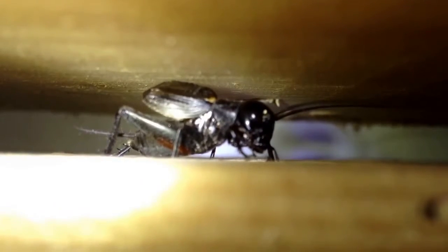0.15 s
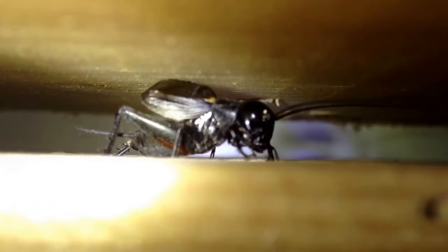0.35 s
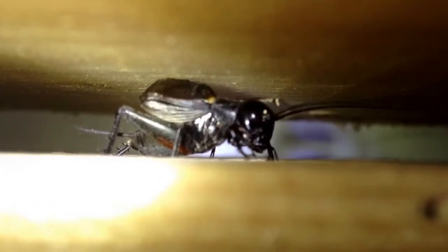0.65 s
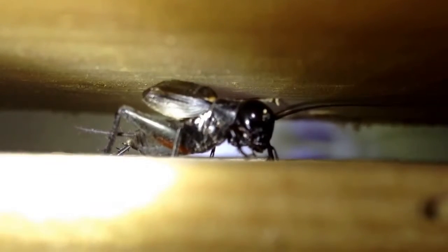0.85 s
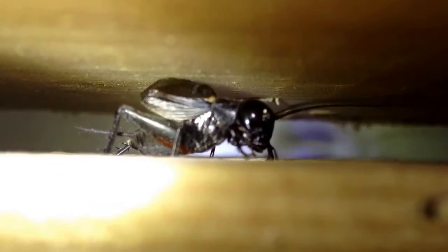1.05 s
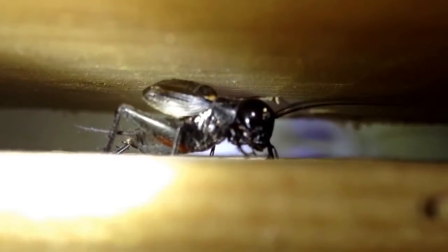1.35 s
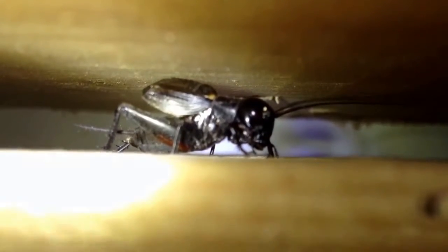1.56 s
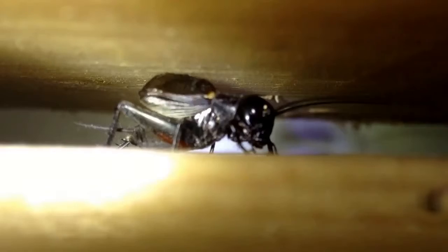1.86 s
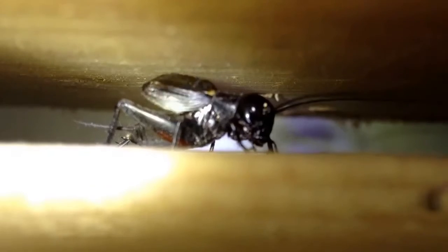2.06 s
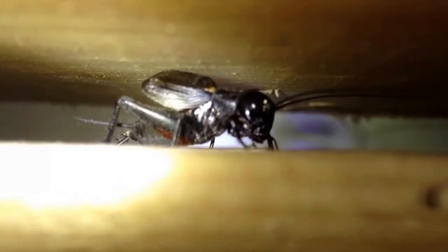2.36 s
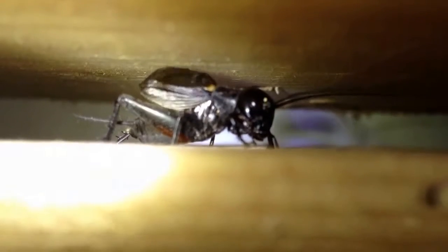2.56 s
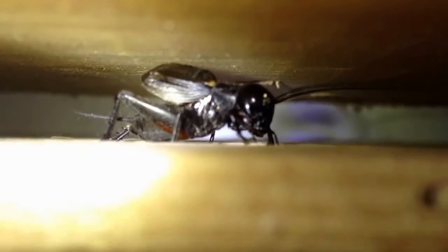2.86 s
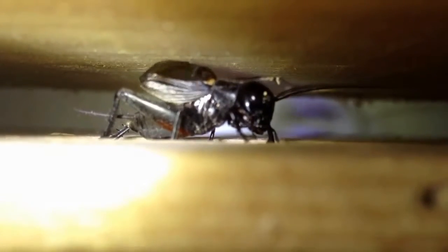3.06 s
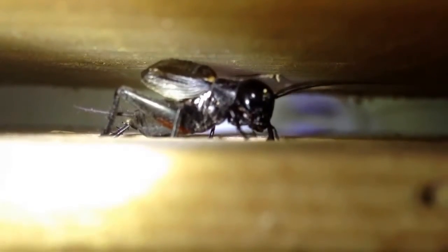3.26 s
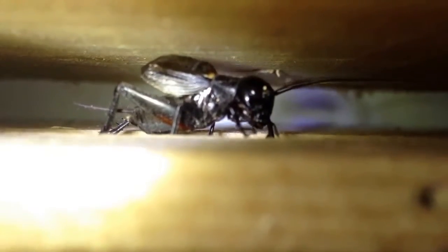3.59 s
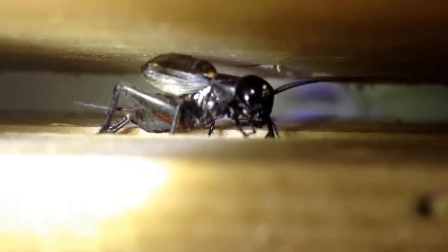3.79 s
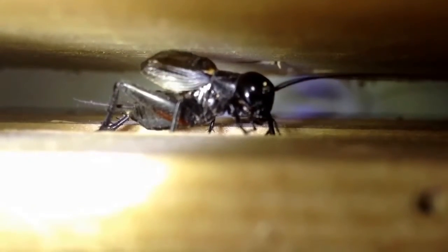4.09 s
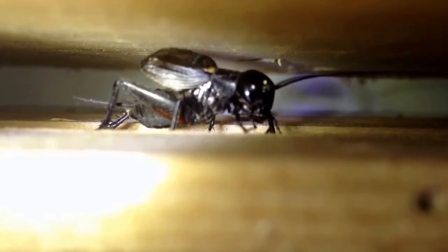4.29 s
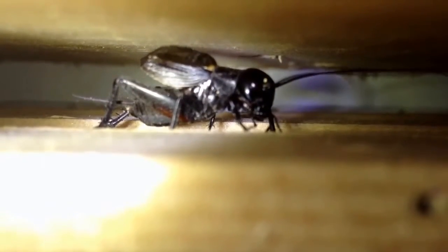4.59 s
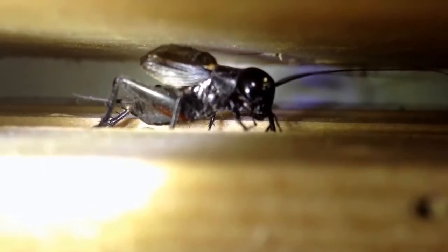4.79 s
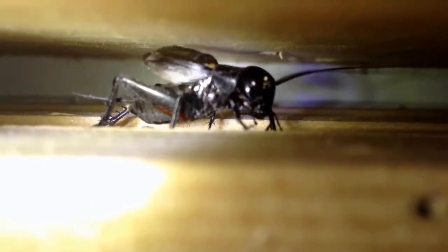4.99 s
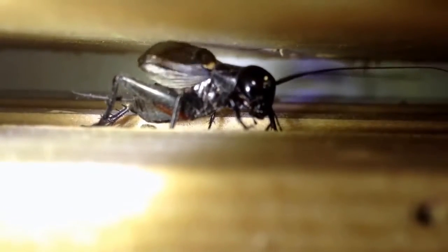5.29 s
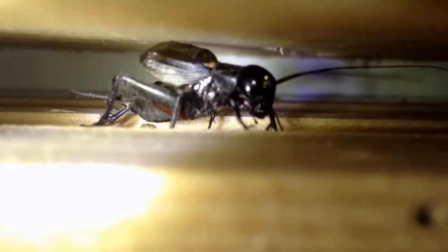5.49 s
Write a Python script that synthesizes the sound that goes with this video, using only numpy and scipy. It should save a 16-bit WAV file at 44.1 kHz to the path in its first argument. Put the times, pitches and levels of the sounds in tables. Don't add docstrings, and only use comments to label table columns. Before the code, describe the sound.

A single field cricket chirps very close from the start, quick high trills of two or three pulses at slightly uneven intervals. Soft brushing and light wooden taps come in beneath, then dry gritty crackles gather around the middle. Near the end a heavier bump on wood bounces briefly to rest while the chirps continue. Tight wooden gap at night, short board echoes, steady hiss and faint distant crickets; close small microphone, thin in the bass.

```python
import sys
import numpy as np
from scipy import signal
from scipy.fft import rfft, irfft
from scipy.io import wavfile

SR = 44100
rng = np.random.default_rng(int(sys.argv[2]) if len(sys.argv) > 2 else 0)


def undo_db(level):
    steps = np.asarray(level, float) / 20
    return 10 ** steps


def bounce(signal):
    frames = np.transpose(np.atleast_2d(signal))
    limited = np.clip(frames, -1, 1)
    pcm = np.round(limited * 32767).astype(np.int16)
    wavfile.write(sys.argv[1], SR, pcm)


N = 248724

# f/Hz, density/dB per Hz
HISS_SPECTRUM = [(18, -56), (30, -55), (43, -20.5), (182, -1), (284, -4), (505, -9), (728, -8), (1020, -9),
                 (1140, -10.5), (1330, -11.5), (3780, -13.5), (4660, -10), (9680, -23), (13300, -17.5),
                 (15500, -13.5)]
# top t/s, peak level/dB, rise/s, fall/s (both over 20 dB)
DRONE_SWELLS = [
    (0.41, -74.5, 4.2, 1.5),
    (1.43, -70, 0.58, 0.79),
    (1.75, -78.5, 0.65, 0.55),
    (2.81, -76.5, 0.39, 0.92),
    (3.58, -76, 0.43, 0.78),
    (4.4, -68, 0.31, 1.6),
    (5.64, -85, 0.39, 1.0),
]
# f/Hz, density/dB per Hz
BRUSH_SPECTRUM = [(71, -35), (120, -3), (374, -8), (500, 0.5), (785, -5), (1800, -0.5), (2080, -4),
                  (4610, -8.5), (9000, -19.5), (11700, -61), (19800, -120)]
# top t/s, peak level/dB, brightness/dB, rise/s, fall/s (both over 20 dB)
BRUSH_STROKES = [(0.1, -65.5, -3, 0.27, 0.3), (0.255, -53, -35, 0.012, 0.13), (0.372, -60, -24, 0.019, .2),
                 (0.412, -58.5, 2.5, 0.0079, 0.12), (1.11, -63.5, -22, 0.093, 0.32),
                 (1.19, -65.5, 6, 0.087, 0.17), (1.836, -66.5, -9, 0.16, 0.055),
                 (2.455, -59, -12, 0.0095, 0.2), (2.818, -65, -8, 0.057, .03), (2.99, -71.5, -1, .1, 0.17),
                 (3.385, -66.5, -22, .03, 0.25), (3.465, -66.5, -2, 0.18, .02), (3.508, -64, -6, .035, .2),
                 (3.8, -78, 2, 0.5, .08), (5.25, -67.5, -5, 0.23, 0.026),
                 (5.286, -60.5, -27, 0.0053, 0.012)]
# t/s, peak level/dB, lower band/dB
DRY_TICKS = [(1.736, -59.5, 3.5), (2.817, -57.5, 6), (2.8888, -62, 0), (2.948, -61.5, 4), (2.988, -61, 4),
             (3.013, -61, 5.5), (3.0407, -67, 13), (3.5924, -53, -3), (3.6426, -63, 3), (3.6574, -58, 1),
             (3.6735, -49, -5.5), (3.6874, -61, -3), (3.717, -58, -7), (3.7274, -63, -17),
             (3.7394, -64, -17), (3.7494, -63, -14), (3.7814, -49, -1), (3.788, -44, -4), (3.806, -58, 1),
             (3.8317, -56, -5), (3.8816, -58, -13), (3.8964, -57, -17), (4.5326, -61, -7), (4.5544, -63, 4),
             (4.8389, -60, -5), (4.8549, -56, -2), (4.8644, -63, -12), (5.2001, -60, -1),
             (5.214, -65.5, 7.5)]
# t/s, peak level/dB, lower band/dB, length/ms
DRY_SHUFFLES = [
    (2.1, -77, 11, 14),
    (2.495, -62, -3, 70),
    (3.3, -76, 10, 12),
    (3.7, -61.5, -2, 200),
    (3.85, -72, -8, 120),
]
# t/s, peak level/dB, pitch f/Hz, brightness/dB
LIGHT_KNOCKS = [(0.248, -58, 440, -1), (0.405, -54.5, 228, -10), (1.628, -52.5, 139, -20),
                (1.865, -45, 198, -31), (2.041, -53, 168, -23), (2.45, -57.5, 550, -4),
                (2.667, -67, 186, 2), (2.817, -48.5, 197, -16), (2.951, -52.5, 198, -9),
                (2.987, -49, 188, -12.5), (3.009, -54, 232, -12), (3.035, -56, 196, -11),
                (3.379, -53, 532, -21), (3.4, -53, 563, -20), (3.505, -52, 203, -16),
                (3.532, -54, 235, -14), (3.604, -73, 215, -16), (3.748, -50, 201, -21),
                (3.8, -47.5, 275, -18), (3.819, -53.5, 157, -22), (3.915, -54, 510, -34),
                (4.867, -47, 242, -25)]
# t/s, peak level/dB, pitch f/Hz, brightness/dB, T60/s
HEAVY_BUMP = [
    (5.138, -42.5, 565, -2.5, .054),
    (5.144, -31, 423, -14, 0.016),
    (5.152, -33, 334, -32, 0.049),
    (5.163, -43, 172, -20, 0.11),
    (5.185, -54, 190, -28, .09),
    (5.211, -48.5, 274, -18, 0.07),
    (5.24, -42, 229, -19, 0.043),
    (5.261, -56, 255, -14, 0.017),
    (5.286, -42, 234, -16, .027),
    (5.296, -45, 170, -27, 0.02),
]
# multiple of pitch, level/dB
WOOD_MODES = [(1.0, 0.5), (1.45, -10.5), (.55, -13.5), (2.9, -7.5)]
# delay/ms, level/dB
BOARD_ECHOES = [(11.1, -24), (13.96, -22), (16.33, -26), (18.45, -19), (24.84, -29), (28.89, -24),
                (34.91, -25), (55.96, -32), (65.4, -34), (83.6, -33), (104.3, -34), (119.9, -34.5),
                (136.2, -37), (151.7, -39)]
# t/s, peak level/dB, pitch f/Hz
FAINT_STROKES = [(0.0167, -60.5, 4590), (0.4517, -65, 4760), (0.797, -66, 4644), (1.1851, -69, 4533),
                 (1.929, -68, 4600), (2.2523, -63, 4500), (2.6588, -60.5, 4630), (3.1892, -61.5, 4540),
                 (3.508, -70, 4707), (3.9564, -63.5, 4480), (4.273, -58.5, 4430), (5.036, -62, 4720),
                 (5.44, -57.5, 4700)]
# t/s, peak level/dB, pitch f/Hz, length/ms
MEDIUM_STROKES = [(0.0445, -38.5, 4775, 17), (0.4818, -39, 4770, 18.3), (0.8264, -37.0, 4790, 15),
                  (1.2125, -39, 4715, 17), (1.9593, -38, 4746, 16), (2.2836, -38.5, 4795, 16.4),
                  (2.6905, -37.5, 4780, 17.6), (3.2239, -37, 4770, 16), (3.537, -37, 4740, 14.9),
                  (3.9881, -36.5, 4725, 19.7), (4.3033, -35.5, 4730, 16), (5.0695, -34, 4684, 16),
                  (5.4712, -34, 4766, 15)]
FULL_STROKES = [(0.0836, -32.5, 4820, 15.7), (0.5233, -33, 4800, 14), (0.8661, -33, 4820, 16.6),
                (1.2501, -33, 4830, 14.6), (1.2973, -32, 4820, 16), (1.998, -33.5, 4813, 16.2),
                (2.3231, -33, 4830, 17), (2.7288, -33, 4820, 18.2), (3.2624, -32.5, 4810, 16),
                (3.5763, -31.5, 4820, 15.0), (4.0279, -30.5, 4810, 15.6), (4.3413, -31, 4806, 17),
                (5.1067, -30, 4810, 16.2), (5.511, -29.5, 4805, 15.4)]
# share of length, pitch shift/%, tone level/dB
FAINT_COURSE = [(-.3, 4, -24), (.2, 1.6, -8), (.5, -1.5, -9), (1, .4, -18)]
MEDIUM_COURSE = [(-.25, 1, -40), (-.03, 1, -17), (.1, 1.1, -5), (.36, .6, -.5), (.56, 0, -2),
                 (.72, -2.1, -5), (.85, -3.6, -4), (.98, -4.2, -19), (1.5, -4.5, -45)]
FULL_COURSE = [(-.3, 0, -40), (0, .8, -12), (.17, 1.7, -4.5), (.55, 1.4, -1.5), (.85, -.7, -1),
               (.99, -2.3, -12), (1.08, -2.8, -8), (1.3, -3.5, -18), (2.2, -4, -50)]
# level/dB, share at top, share to -10 dB before, after
FAINT_PARTIALS = [(-57, .2, .6, .5), (-60, .2, .6, .5), (0, 0.28, 0.7, 0.71)]
MEDIUM_PARTIALS = [(-27, 0.36, 0.54, 1.4), (-30, 0.59, .22, 0.31), (-21.5, .0, 0.23, 1.8)]
FULL_PARTIALS = [(-25, 0.39, 0.48, 0.53), (-36, 0.51, 0.66, .45), (-26.5, -0.19, 0.086, 2.4)]
# f/Hz, width/Hz, level/dB
WING_MODES = [(4434, 240, 8.5), (5940, 930, -2), (7630, 690, -4), (7770, 780, -4)]


def band(x, lo_hz, hi_hz):
    return signal.sosfilt(signal.butter(2, [lo_hz, min(hi_hz, .45 * SR)], "band", fs=SR, output="sos"), x)


def rms_one(x):
    return x / np.sqrt(np.mean(x ** 2) + 1e-20)


def resonance(x, hz, width_hz):
    r = np.exp(-np.pi * width_hz / SR)
    zeros = np.array([1, 0, -1]) * (1 - r * r) / 2
    return signal.lfilter(zeros, [1, -2 * r * np.cos(2 * np.pi * hz / SR), r * r], x)


def double_resonance(x, hz, width_hz):
    return resonance(resonance(x, hz, width_hz), hz, width_hz)


def drift(rate_hz):
    r = np.exp(-2 * np.pi * rate_hz / SR)
    return rms_one(signal.lfilter([1], [1, -2 * r, r * r], rng.standard_normal(N + SR))[SR:])


def coloured(x, spectrum):
    hz, db = np.transpose(spectrum)
    grid_hz = np.maximum(np.arange(N // 2 + 1) * SR / N, 1)
    gain = undo_db(np.interp(np.log(grid_hz), np.log(hz), db))
    return rms_one(irfft(rfft(x) * gain, N))


def add(out, s, piece):
    i = max(round(s * SR), 0)
    out[i:i + len(piece)] += piece[:N - i]


def swell(at, db, top, rise, fall, power=1):
    side = np.where(at < top, max(rise, .003), max(fall, .003))
    return db - 20 / power * np.abs((at - top) / side) ** power


def hiss():
    return undo_db(-65) * coloured(rng.standard_normal(N), HISS_SPECTRUM)


def far_crickets():
    song = rms_one(double_resonance(rng.standard_normal(N), hz=4700, width_hz=310))
    return undo_db(-85.5 + 3.6 * drift(38)) * song


def drone():
    air, t = rng.standard_normal(N), np.arange(N) / SR
    hum = rms_one(double_resonance(air, 293.5, 54) + 0.54 * band(air, 152, 495))
    return sum(undo_db(swell(t, db, s, rise, fall)) for s, db, rise, fall in DRONE_SWELLS) * hum


def brushing():
    t, level, bright = np.arange(N) / SR, np.zeros(N), np.zeros(N)
    for s, db, bright_db, rise, fall in BRUSH_STROKES:
        level += undo_db(swell(t, db, s, rise, fall))
        bright += undo_db(swell(t, db + bright_db, s, rise, fall))
    grains_per_s = 4000
    hits = rng.random(N) < grains_per_s / SR
    grains = hits * undo_db(rng.exponential(1, N)) * rng.choice([-1, 1], N)
    noise = undo_db(1.3 * drift(39)) * coloured(grains + 0.5 * rng.standard_normal(N), BRUSH_SPECTRUM)
    dull = signal.sosfilt(signal.butter(1, 2200, fs=SR, output="sos"), noise)
    return undo_db(2.0) * level * dull + undo_db(0.5) * bright * band(noise, 1730, 5650)


def ticks():
    tick_ms = 9.2
    high, low = np.zeros(N), np.zeros(N)
    for s, db, low_db, ms in [row + (tick_ms,) for row in DRY_TICKS] + DRY_SHUFFLES:
        burst = np.hanning(max(round(ms * SR / 1000), 8)) * undo_db(db - 7)
        add(high, s - 0.31 * ms / 1000, burst)
        add(low, s - 0.36 * ms / 1000, burst * undo_db(low_db))
    grit = rng.standard_normal(N) * undo_db(3.2 * drift(400))
    bright_grit = rms_one(band(band(grit, 12400, 17000), 12400, 17000))
    return high * bright_grit + low * rms_one(band(grit, 3800, 8100))


def knocks():
    knock_t60_s, crack_t60_s = 0.043, 0.042
    lag_s = 0.00299
    out, t = np.zeros(N), np.arange(SR // 4) / SR
    blows = [row + (knock_t60_s,) for row in LIGHT_KNOCKS] + HEAVY_BUMP
    chance = rng.standard_normal((len(blows), len(WOOD_MODES)))
    crack = rms_one(band(rng.standard_normal(N), 250, 2420))
    for (s, db, hz, bright_db, t60_s), spread in zip(blows, chance):
        body = np.zeros(len(t))
        for (multiple, mode_db), c in zip(WOOD_MODES, spread):
            level_db = mode_db + 2 * c - 60 * t * multiple / max(t60_s, .01)
            body += undo_db(level_db) * np.sin(2 * np.pi * hz * multiple * t)
        snap = undo_db(bright_db - 60 * t / crack_t60_s) * np.roll(crack, -round(s * SR))[:len(t)]
        add(out, s + lag_s, undo_db(db) * (body + snap) * np.clip(t / 0.001, 0, 1))
    return out


def surroundings(x):
    near_db, near_t60_s, far_db, far_t60_s = -13, 0.11, -29, 0.6
    t = np.arange(SR) / SR
    onset = np.clip((t - .008) / .01, 0, 1)
    near = rng.standard_normal(SR) * undo_db(-60 * t / near_t60_s) * onset
    far = rng.standard_normal(SR) * undo_db(-60 * t / far_t60_s) * onset
    far = far + undo_db(9) * resonance(far, hz=4915, width_hz=60)
    response = undo_db(near_db) * near / np.linalg.norm(near) + undo_db(far_db) * far / np.linalg.norm(far)
    for ms, db in BOARD_ECHOES:
        response[round(ms * SR / 1000)] += undo_db(db)
    return band(signal.fftconvolve(x, response)[:N], 90, 5850)


def wing_scrape():
    teeth = rng.standard_normal(N) * undo_db(2.2 * drift(500))
    wing = np.zeros(N)
    for k, (hz, width_hz, db) in enumerate(WING_MODES):
        wing += (-1) ** k * undo_db(db) * double_resonance(teeth, hz, 1.4 * width_hz)
    return rms_one(wing)


def strokes(table, course, partials, wobble_db, half_db, catch_db):
    catch_width, release_at, release_db = 0.086, 0.91, -100
    half_at, half_width = 0.05, 0.094
    share, shift_pct, tone_db = np.transpose(course)
    tone, scrape = np.zeros(N), np.zeros(N)
    for (s, db, hz, ms), start in zip(table, rng.random(len(table))):
        at = np.arange(share[0], share[-1], 1000 / SR / ms)
        pitch_hz = hz * (1 + np.interp(at, share, shift_pct) / 100)
        phase = 2 * np.pi * (start + np.cumsum(pitch_hz) / SR)
        second, third, rasp = (undo_db(db + swell(at, *row, power=2)) for row in partials)
        second = second * undo_db(catch_db * np.exp(-((at - partials[1][1]) / catch_width) ** 2))
        held = undo_db(release_db * np.maximum(at - release_at, 0))
        overtones = second * np.sin(2 * phase) + undo_db(3) * third * np.sin(3 * phase)
        half = undo_db(db + half_db) * np.exp(-((at - half_at) / half_width) ** 2) * np.sin(3 * phase / 2)
        wave = undo_db(db + np.interp(at, share, tone_db)) * np.sin(phase) + held * overtones + half
        begin_s = s + share[0] * ms / 1000
        add(tone, begin_s, np.sqrt(2) * wave)
        add(scrape, begin_s, rasp)
    return tone * undo_db(wobble_db * drift(220)) + undo_db(4.0) * scrape * wing_scrape()


def cricket():
    faint_ms = 7.5
    rows = [row + (faint_ms,) for row in FAINT_STROKES]
    faint = strokes(rows, FAINT_COURSE, FAINT_PARTIALS, wobble_db=3.0, half_db=-30, catch_db=0)
    medium = strokes(MEDIUM_STROKES, MEDIUM_COURSE, MEDIUM_PARTIALS, wobble_db=.8, half_db=-14, catch_db=-7)
    full = strokes(FULL_STROKES, FULL_COURSE, FULL_PARTIALS, wobble_db=.6, half_db=-25, catch_db=0)
    return faint + medium + full


def scene():
    mic_low_hz = 135
    song, wood = cricket(), knocks()
    near = song + wood + surroundings(song + undo_db(-3) * wood) + ticks() + brushing()
    near = signal.sosfilt(signal.butter(6, mic_low_hz, "high", fs=SR, output="sos"), near)
    return (near + drone() + hiss() + far_crickets())[None]


def low_pass(x):
    return signal.sosfilt(signal.butter(12, 15650, fs=SR, output="sos"), x)


def record(dry):
    stop_hz = 15550
    mix = signal.sosfilt(signal.cheby2(24, 60, stop_hz, fs=SR, output="sos"), dry)
    return low_pass(mix)


dry = scene()
out = record(dry)
bounce(out)
```